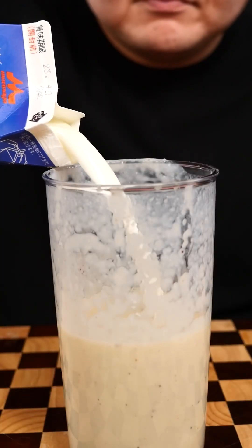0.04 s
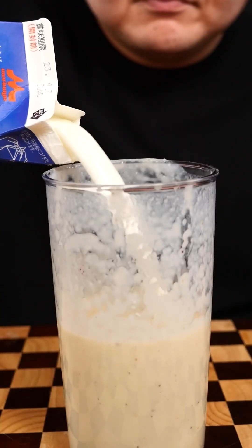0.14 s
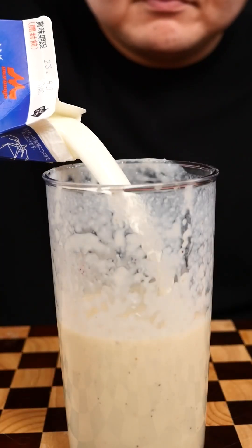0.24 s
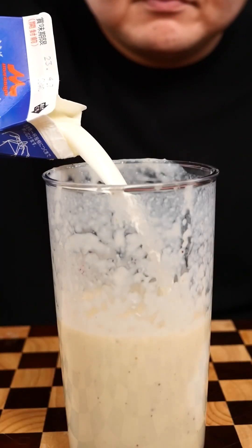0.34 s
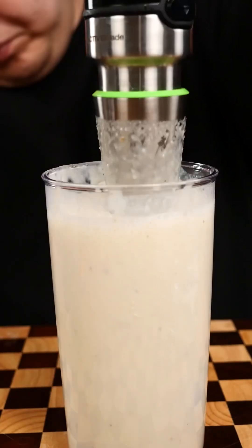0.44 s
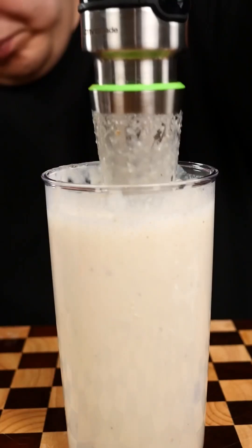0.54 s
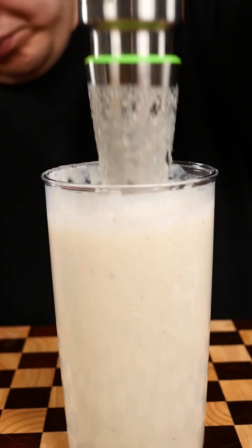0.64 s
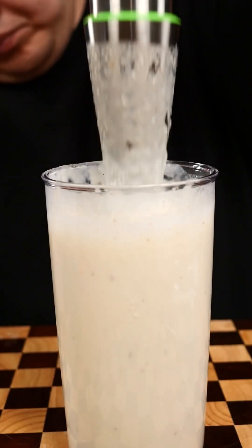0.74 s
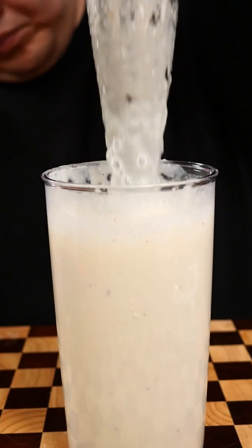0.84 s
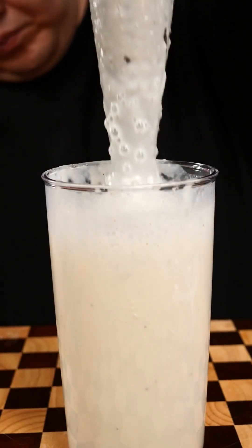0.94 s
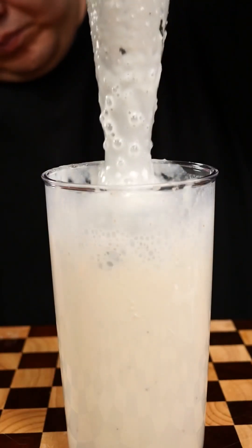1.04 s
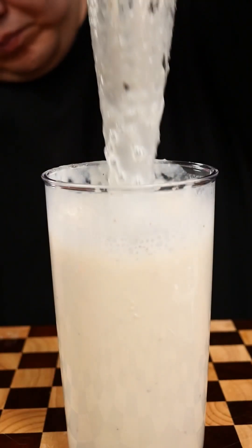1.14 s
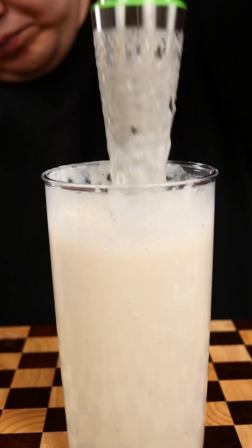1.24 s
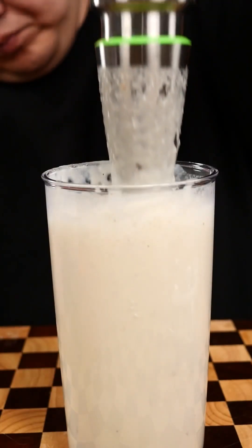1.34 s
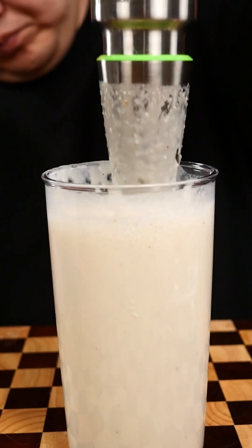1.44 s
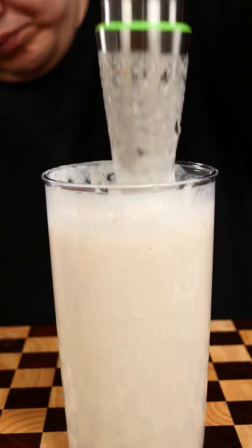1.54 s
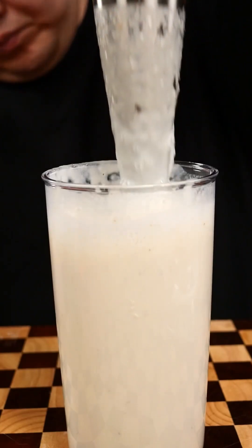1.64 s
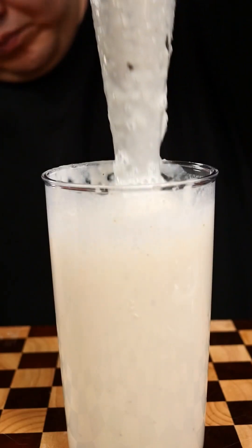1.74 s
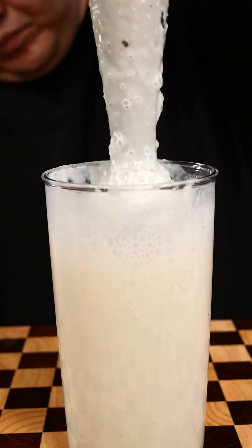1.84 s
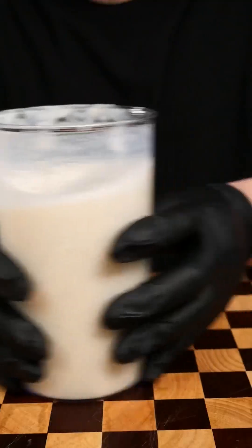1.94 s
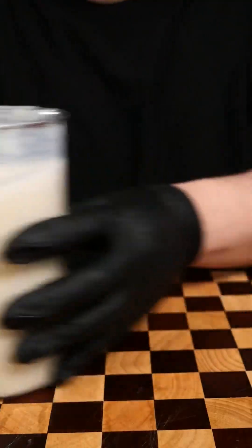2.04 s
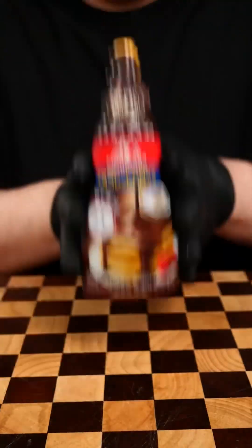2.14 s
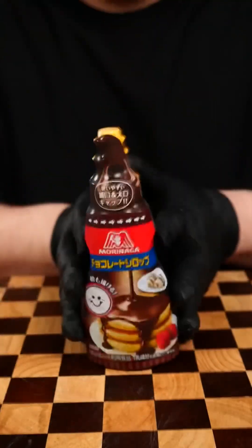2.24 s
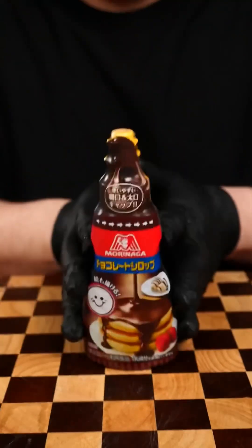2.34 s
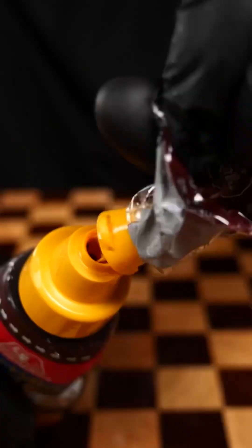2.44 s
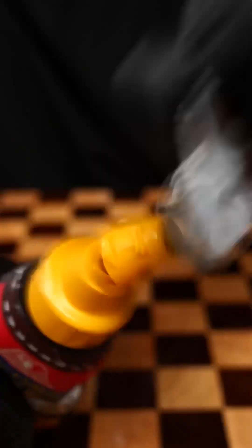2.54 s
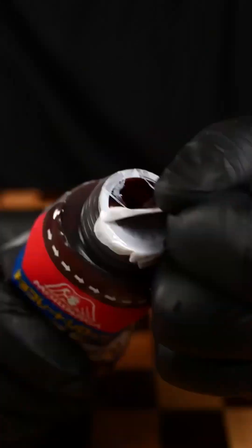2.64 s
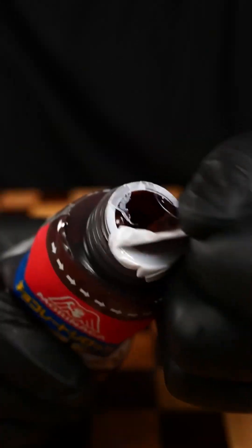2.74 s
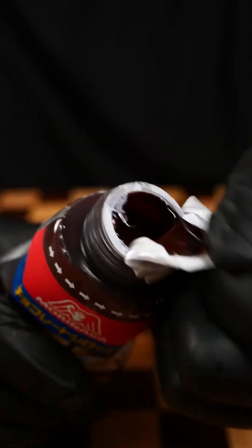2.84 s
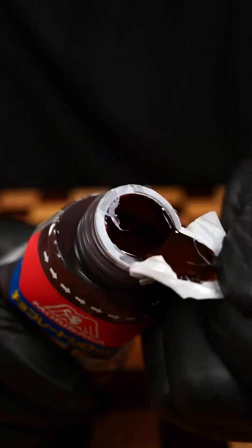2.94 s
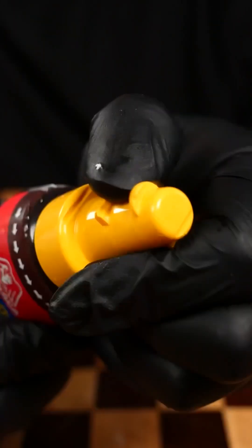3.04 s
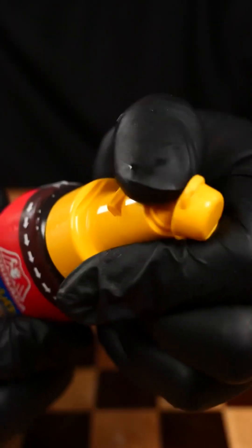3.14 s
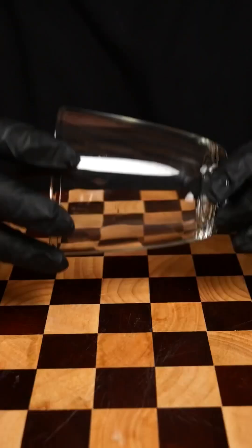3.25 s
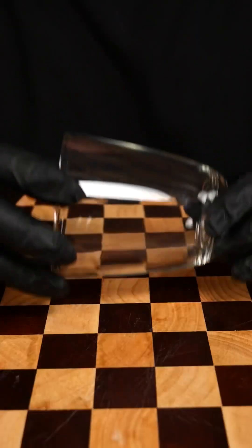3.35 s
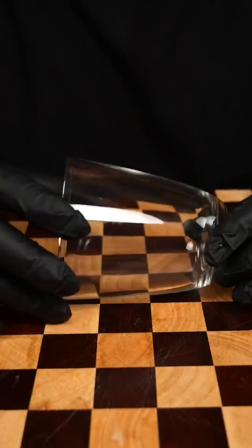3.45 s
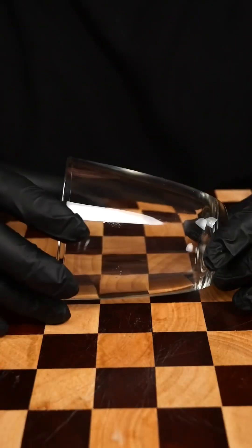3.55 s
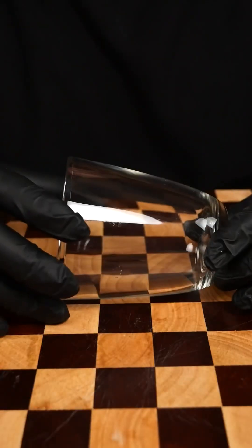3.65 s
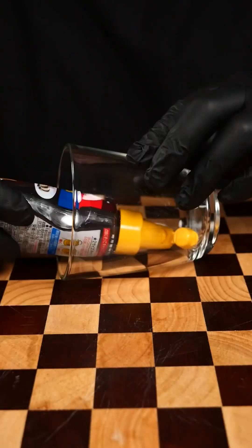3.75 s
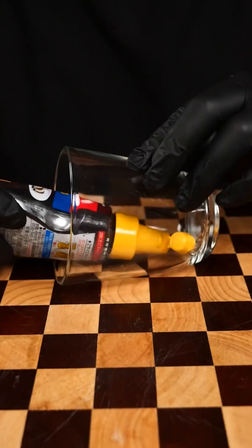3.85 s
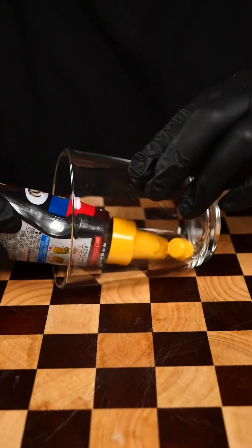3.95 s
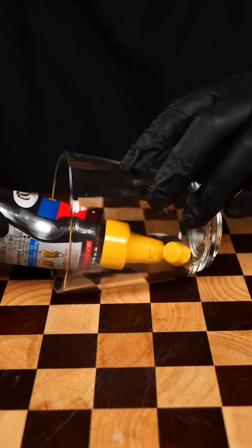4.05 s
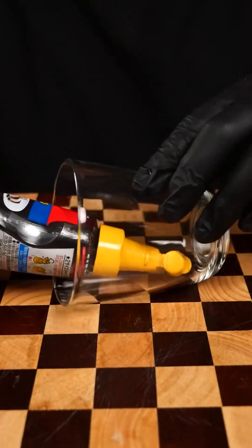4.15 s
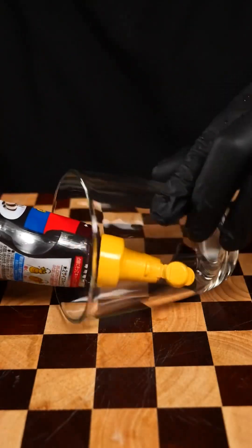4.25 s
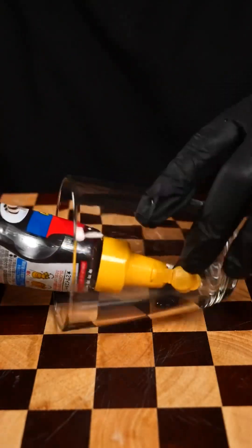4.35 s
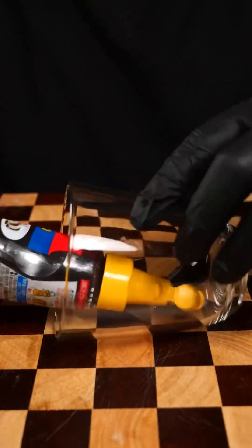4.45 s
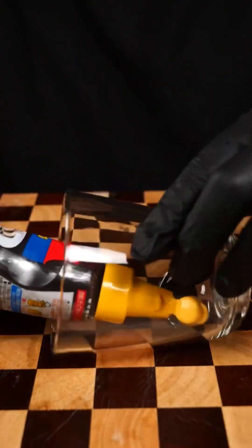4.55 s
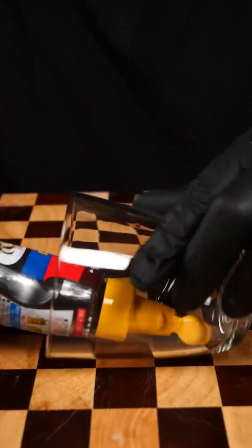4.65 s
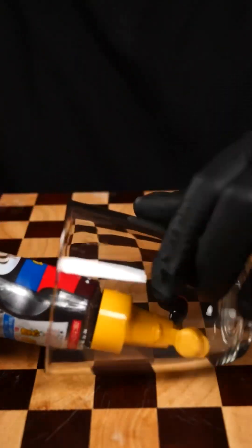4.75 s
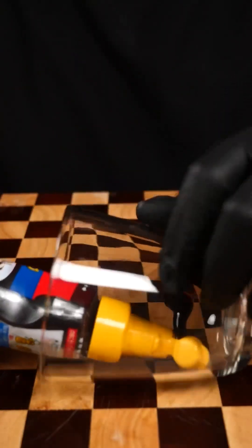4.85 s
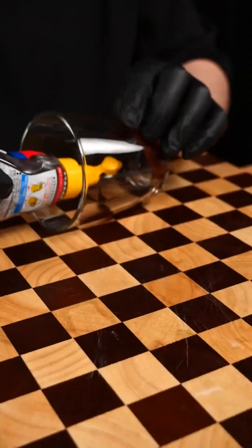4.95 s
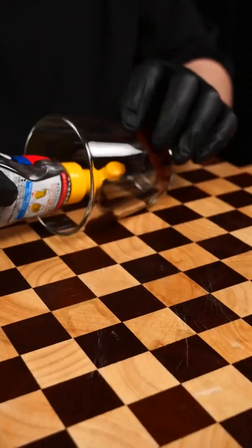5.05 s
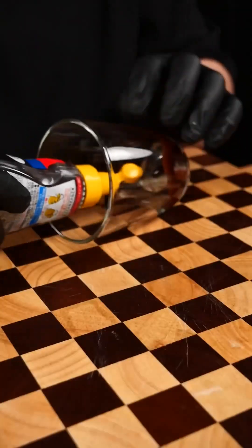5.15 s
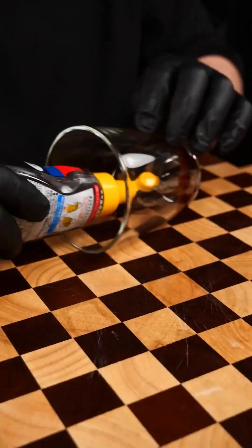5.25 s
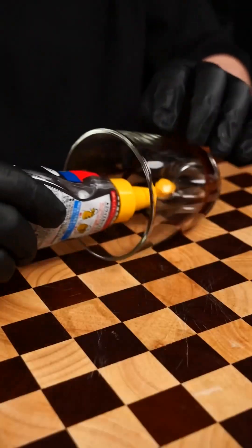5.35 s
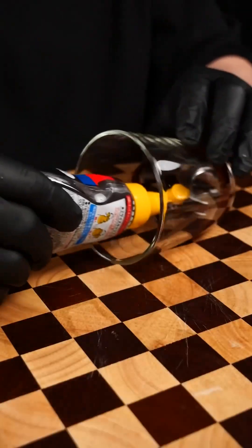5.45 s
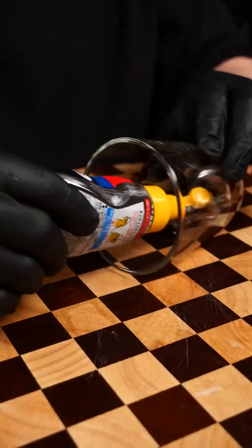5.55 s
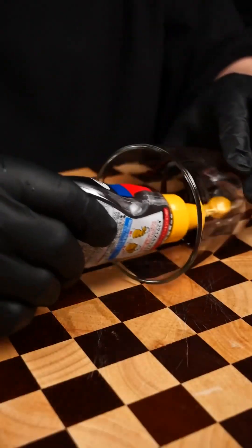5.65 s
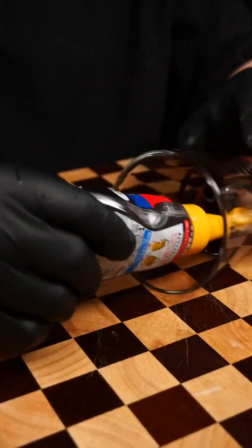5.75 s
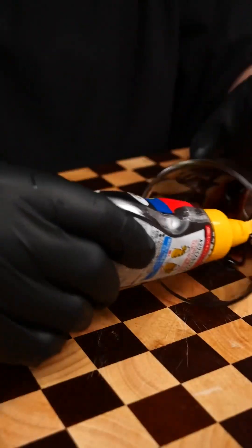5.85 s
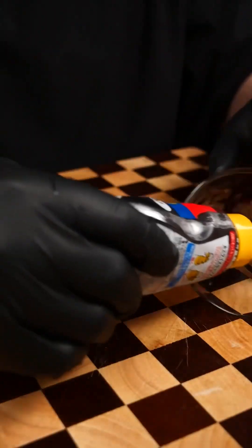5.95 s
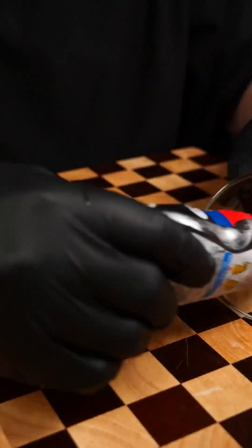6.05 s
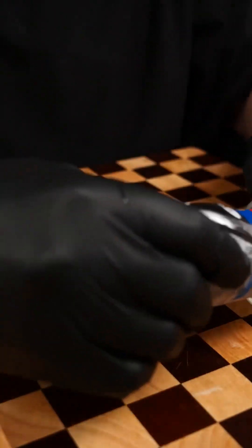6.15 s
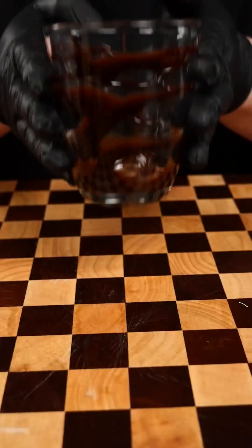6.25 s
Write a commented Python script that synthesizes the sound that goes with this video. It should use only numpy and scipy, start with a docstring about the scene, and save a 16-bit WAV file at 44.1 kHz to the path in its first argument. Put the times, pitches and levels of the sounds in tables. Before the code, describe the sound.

A hand blender briefly churns milk, then a plastic bottle thuds and snaps open, and a glass knocks and rolls quietly on wood.

```python
"""A hand blender churns milk in a jar, heard close on a kitchen counter: its gears whine while the blade
plunges, lifts and splashes through the surface. Milk drips first; afterwards the jar scrapes away. A
plastic bottle thuds down, its wrap snaps, its seal peels and its cap pops on, ringing the neck. A tumbler
is laid on a wooden board and rolled under rubber gloves while the nozzle chinks on it. Hard cuts join the
short shots, each with its own gain, so hiss and hum step; the loudest blows saturate."""
import sys
import numpy as np
from scipy import signal
from scipy.fft import rfft, irfft, next_fast_len
from scipy.io import wavfile
from scipy.ndimage import uniform_filter1d, map_coordinates

SR = 44100
rng = np.random.default_rng(int(sys.argv[2]) if len(sys.argv) > 2 else 0)


def wav_out(sig):
    """Save sig, one row per channel (or a flat mono array), as 16-bit PCM at SR to the path in sys.argv[1]."""
    wavfile.write(sys.argv[1], SR, np.round(np.clip(np.atleast_2d(sig).T, -1, 1) * 32767).astype(np.int16))


N = 277609
T = np.arange(N) / SR

# Background bed of each shot: start_s, hiss_db, hum_db, murmur_db
SHOTS = [(0, -61, -61.5, -58.5), (.483, -59, -62, -54.5), (2.127, -60, -61.5, -58),
         (2.234, -81, -57.5, -53), (2.443, -57.5, -60, -59), (2.557, -74, -52, -74),
         (2.64, -62.5, -59.5, -60.5), (2.96, -61.5, -59, -58.5), (3.46, -77, -74, -52.5),
         (3.708, -61.5, -81.5, -58.5), (4.93, -60, -73.5, -62.5), (6.179, -62, -62.5, -59.5)]
# Colours of preamp hiss, room hum and appliance murmur: freq_hz, density_db
HISS = [(300, -10.5), (2000, 12.5), (14500, 4), (15800, -3), (16150, -41.5)]
HUM = [(20, -33.5), (60, -18.5), (130, -1.5), (250, 3.5), (400, -4), (700, -31)]
MURMUR = [(250, -17), (550, 2.5), (1000, -1.5), (2000, -7.5), (3000, -17), (4500, -26.5)]
# Steady tones, one set per shot: appliance whines, and in the last set a ringing of the glass near 3.3 kHz:
# level_db, bands of (centre_hz, width_hz, gain_db)
STEADY_TONES = [(-61, [(983, 4.1, 4), (1186, 14, -12)]), (-61.5, [(759, 15, -7.5), (1790, 10.5, -13),
                (2896, 41, -15), (3440, 8.3, -11)]), (-61, [(366, 59, -9), (482, 4.4, 3),
                (2050, 19, -3), (3286, 50, -10)])]
# Where each set of tones is heard: shot_index
WHINE_SHOTS = [0, 9, 10]
# Milk drips, and slaps of milk thrown off the blade: start_s, level_db, pitch_hz
DRIPS = [(0.0199, -37.5, 2140), (0.0892, -35, 2240), (0.2264, -38.5, 2230), (0.2483, -37, 2200),
         (0.3815, -36, 3900), (0.391, -36, 2460), (0.4469, -40, 2300)]
SPLATS = [(.981, -12, 1490), (1.005, -8, 2480), (1.079, -8.5, 1510), (1.872, -10.5, 1280)]

# The switch and the blade's first jerks: start_s, level_db
START_JERKS = [(0.484, -30), (0.4923, -19), (0.4977, -12), (0.5075, -3.5)]
# Ring of the shaft and guard: pitch_hz, gain_db, t60_s
SHAFT_MODES = [(1700, 0.5, 0.016), (2300, 10, 0.0041), (3400, -9, 0.011), (5200, -12.5, 0.0094),
               (6400, -15.5, 0.0079)]
# The blade's path: time_s, height (0 deep in the jar, 1 at the surface, 2 clear of it)
BLADE_PATH = [(.5, 1.3), (.61, 0), (.82, 0.13), (.92, 0.37), (.965, 0.56), (1.045, 1.23), (1.075, 1.91),
              (1.125, 2), (1.24, 0.14), (1.35, 0.16), (1.6, 0.22), (1.75, 0.28), (1.81, 0.67), (1.92, 1.94)]
# Low shaft orders and one overtone, against the gear whine: pitch_ratio; gain_db
ORDER_RATIOS = [1 / 24, 2 / 24, 4 / 24, 5 / 24, 6 / 24, 2]
ORDER_DB = [-25, -17.5, -10, -9, -5, -21.5]
# Bearing rasp: centre_hz, width_hz, gain_db
BEARING_BANDS = [(4800, 140, 0), (4860, 180, 0)]
# Colours of churn, splash, spray and the surface breaking: freq_hz, density_db
CHURN = [(35, -47), (60, -35), (81, -38), (119, -26), (220, -16.5), (345, -3), (563, -4), (797, 3),
         (1070, -16.5), (1300, -58), (1690, -52), (2860, -120)]
SPLASH = [(530, -35), (900, -5), (945, 2), (1380, 5), (2140, 2), (3300, -17.5), (4290, -33), (7260, -120)]
SPRAY = [(1650, 0.5), (2800, 3), (4340, -2), (4430, -7), (4910, 1), (5480, -6), (8240, -12.5), (9820, -23),
         (12900, -38), (16000, -63)]
SURF = [(900, -59), (1400, -4.5), (2000, 2), (2600, 1), (3000, -12), (4200, -17), (7000, -28.5)]
# Fader curve of the sliding jar: time_s, level_db
SLIDE_LEVELS = [(1.893, -37.5), (1.958, -34), (1.962, -30.5), (2.02, -27), (2.06, -26), (2.08, -24),
                (2.11, -24), (2.125, -29.5)]
# Colour of its scrape: freq_hz, density_db
SCRAPE = [(60, -40.5), (130, -21), (222, -21.5), (301, -8.5), (427, -16), (682, 0.5), (1380, -14),
          (1620, -7), (2050, -13.5), (2580, -10), (3040, -24), (6740, -33.5), (16000, -61.5)]

# The bottle's edge touches first: start_s, level_db, pitch_hz
EDGE_TOUCH = [(2.2345, -13.5, 892)]
# The bottle lands: start_s, level_db
BOTTLE_THUD = [(2.239, 1.5)]
# Ring of the bottle's body, and of its neck and cap: pitch_hz, gain_db, t60_s
BOTTLE_MODES = [(531, -13, 0.017), (767, 10, 0.0078), (1108, -5.5, 0.01), (1640, -6.5, 0.014),
                (2050, -4.5, 0.012), (2490, -17.5, 0.032), (4240, -1.5, 0.0035)]
NECK_MODES = [(530, -13, 0.022), (1254, -19.5, 0.03), (1880, 8, 0.0059), (2220, -9.5, 0.012),
              (2750, -5, 0.011), (3650, -11.5, 0.0078)]
# The board's clearest modes: pitch_hz, gain_db
BOARD_TONES = [(675, -0.5), (735, -3), (780, -1), (1230, -6.5)]
# The board's crowded modes and the counter's boom below: centre_hz, width_hz, gain_db
BOARD_BANDS = [(391, 45, -10), (740, 78, 5)]
COUNTER_BANDS = [(130, 16, 0.5), (179, 39, -10.5)]
# Snaps of wrap, seal and cap: start_s, level_db, treble_hz, neck_ring_db
SNAPS = [(2.474, -47, 5120, 1), (2.4867, -18.5, 5420, -23), (2.5573, 6.5, 4670, -10),
         (2.5588, 4.5, 5060, -5.5), (2.5616, 1.5, 6720, -18.5), (2.611, -37, 5000, 0),
         (2.6698, -22.5, 6200, -25.5), (2.6968, -12, 10750, -33), (2.7143, -16.5, 6300, -9),
         (2.7731, -20.5, 10300, -28), (2.7946, -24.5, 5900, -4.5), (2.804, -6.5, 6360, -20),
         (2.8512, -13.5, 5570, -14), (2.863, -30.5, 5200, -25), (2.8784, -29.5, 6740, -13),
         (2.92, -30, 3640, -5.5), (3.0345, -52, 3000, 17), (3.0818, -5, 5340, 5), (3.0892, -16, 5440, 2),
         (3.126, -29.5, 5460, -13), (3.2492, -47, 4040, 18)]
# Colours of the torn wrap and the crackling seal: freq_hz, density_db
WRAP = [(1000, -13), (2200, -2.5), (7500, -1.5), (12000, -21)]
CRACKLE = [(1760, -18), (3000, -28), (4200, -4), (6130, 3), (11800, -10.5), (16000, -23.5)]
# Pulls at the seal: peak_s, neck_rasp_db, crackle_db
TUGS = [(2.719, -39, -49), (2.77, -35.5, -56), (2.809, -45, -46.5), (2.865, -31, -30.5)]
# Air in the sealed neck, the open neck and the seated cap: centre_hz, width_hz, gain_db
NECK_SHUT, NECK_OPEN = [(2080, 110, 0)], [(2380, 160, 0), (900, 500, -14)]
CAP_HOLLOW = [(2050, 360, 0)]
# Air pushed out as the cap seats: start_s, level_db, pitch_hz
CAP_POP = [(3.0814, -16.5, 470)]

# The tumbler lands and bounces: start_s, level_db
TUMBLER_HITS = [(3.4628, -6.5), (3.4765, -18.5), (3.486, -24.5)]
# Its ring on landing, then under the nozzle before and after the regrip: pitch_hz, gain_db, t60_s
TUMBLER_MODES = [(405, -7.5, 0.014), (729, 0, 0.021), (967, -4.5, 0.024), (1568, -17, 0.087),
                 (2097, -17.5, 0.08), (2374, 11, 0.0074), (2466, -16, .06), (2935, -8, 0.019),
                 (3774, -28, 0.17), (4840, -11.5, 0.0081), (6560, -31, 0.049)]
GLASS_MODES = [(4735, 0, 0.24), (4950, 1, 0.03), (11300, -13, 0.12)]
RIM_MODES = [(885, 6.5, 0.022), (1445, 11.5, 0.0093), (3204, -2, 0.086), (7500, -15, 0.11)]
# The gloves shift: peak_s, level_db
RUSTLES = [(4.0, -64), (4.33, -58), (4.58, -50.5), (4.85, -60.5), (4.95, -75), (5.05, -58.5), (5.27, -59),
           (5.57, -61), (6.05, -78)]
# Colour of the rubber: freq_hz, density_db
GLOVE = [(3000, -3), (6000, 5.5), (9000, -4.5), (12000, 0), (15600, -2.5), (16100, -33.5)]
# Fader curve of the rim rubbing on the board: time_s, level_db
ROLL_LEVELS = [(3.72, -69), (4.27, -63.5), (4.32, -50.5), (4.36, -70), (4.41, -48.5), (4.45, -63),
               (4.92, -65), (5.1, -57), (5.2, -58), (5.3, -53), (5.42, -58.5), (5.68, -58), (5.73, -49),
               (5.78, -64), (5.83, -49.5), (5.87, -55.5), (5.93, -48.5), (6.03, -61), (6.13, -58),
               (6.181, -46)]
# The rub before and after the regrip: centre_hz, width_hz, gain_db
RUB_HIGH, RUB_LOW = [(2170, 370, 0)], [(1360, 240, 15), (840, 210, 7.5), (1740, 71, -11)]
# Contacts that stand out of the roll, and sharp crackles of the gloves near 14 kHz: start_s, level_db, pitch_hz
ROLL_TICKS = [(3.9847, -35, 7000), (4.367, -35, 2050), (4.4975, -30, 2050), (4.538, -37.5, 1960),
              (4.553, -38, 14500), (4.678, -40, 14900), (4.755, -40, 14300), (4.7686, -39, 5000),
              (4.898, -40, 13500), (4.8026, -30.5, 2170), (4.9521, -31.5, 10640), (4.9901, -22, 10320),
              (5.204, -33, 9900), (5.466, -32, 1400), (5.7987, -35, 1360), (5.8985, -35, 1420),
              (5.9385, -34, 1110)]
# The nozzle touches the glass: start_s, level_db
CHINKS = [(3.7444, -46), (4.279, -45.5), (4.405, -51), (4.498, -46), (4.5924, -39), (4.629, -59),
          (4.7125, -43), (4.805, -57), (4.862, -58), (5.983, -39.5), (6.0876, -40), (6.0967, -37.5)]

# Colour of the kitchen's reverb: freq_hz, gain_db
REVERB_COLOUR = [(60, -12), (150, -4.5), (450, 1.5), (780, 6.5), (1200, 2.5), (2200, 2.5), (4000, 2),
                 (12000, -7)]
# Its decay: freq_hz, t60_s
REVERB_DECAY = [(150, 0.78), (800, 0.46), (2500, 0.31), (6000, 0.094), (12000, .12)]
# Level of the side signal against the mid: freq_hz, side_db
WIDTH = [(60, -21), (240, -30.5), (950, -80), (3770, -41), (15000, -27.5)]

MOTOR_ON_S, MOTOR_CUT_S = .498, 1.892
PEEL_S, PEEL_OPEN_S, PEEL_END_S = 2.7, 2.93, 2.965


def amp(db):
    return 10 ** (np.asarray(db) / 20)


def unit(x):
    return x / np.sqrt(np.mean(x ** 2) + 1e-20)


def along(points, hz):
    """Read a curve of (freq_hz, value) points on a log frequency axis."""
    freqs, values = np.transpose(points)
    return np.interp(np.log(hz + 1), np.log(freqs + 1), values)


def fader(points):
    """Gain through (time_s, level_db) points, silent outside them."""
    return amp(np.interp(T, *np.transpose(points), -150, -150))


def swells(times, dbs, rise_s, fall_s):
    """Summed gain of swells that grow to their peak and die away."""
    dt = T - np.asarray(times)[:, None]
    return amp(dbs) @ np.exp(np.where(dt < 0, dt / rise_s, -dt / fall_s))


def dying(s, db, t60):
    """Gain that opens at s and falls 60 dB in t60."""
    return amp(db - 60 * np.maximum(T - s, 0) / t60) * (T >= s)


def wobble(rate):
    """A smooth random curve, rate knots a second."""
    return map_coordinates(rng.standard_normal(int(N * rate / SR) + 4), [T * rate])


def filtered(x, response):
    """EQ x with a response given as a function of frequency."""
    size = next_fast_len(N + 8192)
    return irfft(rfft(x, size) * response(np.fft.rfftfreq(size, 1 / SR)), size)[..., :N]


def noise(spectrum, grain_db=0., rate=300.):
    """Coloured noise of rms 1, made grainy by fast random gain."""
    grains = rng.standard_normal(N) * amp(grain_db * wobble(rate))
    curve = [(0.93, -120), *spectrum, (22000, -120)]
    return unit(filtered(grains, lambda hz: amp(along(curve, hz))))


def resonant(bands):
    """Noise of rms 1 through (centre_hz, width_hz, gain_db) resonances."""
    def response(hz):
        return sum(amp(db) * 1j * hz * width / (centre ** 2 - hz ** 2 + 1j * hz * width)
                   for centre, width, db in bands)
    return unit(filtered(rng.standard_normal(N), response))


def mottle(x, depth_db, bins=3):
    """Make the spectrum flicker in random patches some 40 ms long."""
    spectrum = signal.stft(x, nperseg=512)[2]
    patches = uniform_filter1d(rng.standard_normal(spectrum.shape), size=bins, axis=0)
    patches = uniform_filter1d(patches, size=6, axis=1)
    return unit(signal.istft(spectrum * amp(depth_db * unit(patches)), nperseg=512)[1][:N])


def strike(out, s, db, modes, crack_db, crack_t60):
    """Add one blow: a sharp push and a brief rough contact ring the modes; the contact itself cracks."""
    burst = 1200  # samples
    ring_s = min(.25, max(t60 for _, _, t60 in modes))
    t = np.arange(max(burst, int(ring_s * SR))) / SR
    ring = sum(amp(gain + rng.normal(0, 1) - 60 * t / t60) * np.sin(2 * np.pi * hz * t)
               * (1 - np.exp(-hz * t)) for hz, gain, t60 in modes)
    rough = amp(-60 * t[:burst] / crack_t60) * rng.standard_normal(burst)
    sound = ring + .45 * signal.fftconvolve(ring, rough / np.linalg.norm(rough))[:len(t)]
    sound[:burst] += amp(crack_db) * np.convolve(rough, [.5, 1, .5, -.5, -1, -.5])[:burst]
    part = out[round(s * SR):][:len(t)]
    part += (amp(db) * sound)[:len(part)]


def blows(events, modes, trim_db, crack_db, crack_t60):
    """A run of blows on one object."""
    out = np.zeros(N)
    for s, db in events:
        strike(out, s, db + trim_db, modes, crack_db, crack_t60)
    return out


def taps(events, cycles, crack_db):
    """Small contacts, each at its own pitch, falling 60 dB in so many cycles."""
    out = np.zeros(N)
    for s, db, hz in events:
        strike(out, s, db, [(hz, -2, cycles / hz)], crack_db, crack_t60=.004)
    return out


def shot(x, start_s, end_s, reverb_db, dull_hz):
    """x with the kitchen's reverb, darker above dull_hz, gated between two cuts."""
    hz, t, spectrum = signal.stft(rng.standard_normal(SR // 2), SR, nperseg=256)
    fade_db = along(REVERB_COLOUR, hz)[:, None] - 60 * t / along(REVERB_DECAY, hz)[:, None]
    tail = signal.istft(spectrum * amp(fade_db) / (1 + (hz[:, None] / dull_hz) ** 2), SR, nperseg=256)[1]
    predelayed = np.pad(x, (300, 0))
    wet = signal.fftconvolve(predelayed, tail / np.linalg.norm(tail))[:N]
    return (x + amp(reverb_db) * wet) * (T >= start_s) * (T < end_s)


def background():
    """Preamp hiss, room hum and appliances step in level at every cut."""
    starts, *level_columns = np.transpose(SHOTS)
    shot_index = np.searchsorted(starts, T, "right") - 1
    hiss, hum, murmur = [amp(db)[shot_index] for db in level_columns]
    whines = sum(amp(db) * (shot_index == k) * resonant(bands)
                 for k, (db, bands) in zip(WHINE_SHOTS, STEADY_TONES))
    return hiss * noise(HISS) + hum * noise(HUM) + murmur * noise(MURMUR) + whines


def milk_drips():
    """Milk trickles in as tiny pitched plinks."""
    return taps(DRIPS, cycles=32, crack_db=-19)


def motor(run_s, height, surface):
    """Gears spin up and whine over shaft orders and bearing rasp; the pitch rises as the blade lifts."""
    gear_hz, start_hz, spin_up_s, gear_db = 2110, 1400, .022, -29.5
    unload_hz, sag_hz_per_s = 9.2, 7.9
    hz = gear_hz - (gear_hz - start_hz) * np.exp(-run_s / spin_up_s)
    hz += unload_hz * height - sag_hz_per_s * run_s
    phase = 2 * np.pi * np.cumsum(hz + 4.9 * wobble(11) + 14.06 * wobble(120)) / SR
    # The low orders flutter, and fade as the blade lifts.
    orders = sum(amp(db + (4.8 * wobble(24.87) - 5.5 * height) * (ratio < 1)) * np.sin(ratio * phase)
                 for ratio, db in zip(ORDER_RATIOS, ORDER_DB))
    whine = amp(2.34 * wobble(59.9)) * np.sin(phase)
    gain = np.sqrt(2) * amp(gear_db - 5.5 * surface)  # ducks as the blade breaks the surface
    fuzz = amp(gear_db - 8.5) * resonant([(gear_hz, 130, 0)])  # rough teeth blur the whine
    rasp = sum(amp(-57.5 + 1.4 * wobble(6)) * resonant([band]) for band in BEARING_BANDS)
    return gain * (whine + orders) + fuzz + rasp


def churning_milk(height, surface):
    """A deep blade gives a full gurgle; at the surface it thins and splash and spray take over."""
    churn = amp(-20 - 6 * np.abs(height) ** 0.8) * mottle(noise(CHURN), depth_db=3)
    splash = amp(-28 + 7 * surface + 0.6 * height) * noise(SPLASH, grain_db=1.5, rate=60)
    spray = amp(-37 + 3.5 * surface) * noise(SPRAY, grain_db=1.5, rate=280)
    surf = amp(-23) * surface * mottle(noise(SURF, grain_db=2, rate=150), depth_db=-3)
    return churn + splash + spray + surf


def blender():
    """The shaft jerks into motion, then the blade's height steers both motor and milk."""
    turning_s, surge_s, bite_s = 0.023, 0.13, 0.0081  # hand reverses; first splash fades; milk gets moving
    height = np.interp(T, *np.transpose(BLADE_PATH))
    run_s = np.maximum(T - MOTOR_ON_S, 0)
    rising = uniform_filter1d((np.gradient(height) > 0) * 1., size=round(turning_s * SR))
    # The surface breaks when the blade rises through it, and once at the start.
    surface = rising * np.exp(-((height - 1) / 0.54) ** 2) + 0.68 * np.exp(-(run_s / surge_s) ** 2)
    fade_in = np.minimum(run_s / bite_s, 1) ** 2
    running = motor(run_s, height, surface) + churning_milk(height, surface)
    jerks = blows(START_JERKS, SHAFT_MODES, trim_db=-4.5, crack_db=-31, crack_t60=0.003)
    splats = taps(SPLATS, cycles=26, crack_db=-33.5)
    return (fade_in * running + jerks + splats) * (T < MOTOR_CUT_S)


def jar_slide():
    """The jar drags over the board in a swelling, grainy scrape."""
    return fader(SLIDE_LEVELS) * mottle(noise(SCRAPE, grain_db=1.5, rate=70), depth_db=0.5)


def bottle_landing():
    """The plastic bottle touches edge first, then thuds down and wakes the board."""
    edge = taps(EDGE_TOUCH, cycles=9, crack_db=-34.5)
    thud = blows(BOTTLE_THUD, BOTTLE_MODES, trim_db=3.3, crack_db=-6, crack_t60=0.0016)
    return edge + thud + board(BOTTLE_THUD[-1][0], db=-35, t60=0.28, boom_db=-39)


def board(s, db, t60, boom_db, boom_t60=1):
    """The board blooms a few ms after a landing and hums out over the counter's boom."""
    t = np.maximum(T - s, 0)
    tones = sum(amp(gain + 5.5 + 2.8 * wobble(30)) * np.sin(2 * np.pi * hz * t) for hz, gain in BOARD_TONES)
    hum = dying(s, db, t60) * (resonant(BOARD_BANDS) + tones)
    boom = dying(s, boom_db, boom_t60) * resonant(COUNTER_BANDS)
    return (hum + boom) * (1 - np.exp(-(t / 0.0031) ** 2))


def plastic_snaps():
    """Bright snaps ring the neck; those of the seal also sound its air, a note that rises as it opens."""
    out = np.zeros(N)
    for s, db, hz, neck_db in SNAPS:
        modes = [(hz, -2, .0045), (1.3 * hz, -6, .0035), (0.68 * hz, -9, .004)]
        if PEEL_S - .05 < s < PEEL_END_S:
            air_hz = np.interp(s, [PEEL_S, PEEL_OPEN_S], [NECK_SHUT[0][0], NECK_OPEN[0][0]])
            modes.append((air_hz, neck_db + 8, 0.015))
        modes += [(pitch, gain + neck_db - 7, t60) for pitch, gain, t60 in NECK_MODES]
        strike(out, s, db, modes, crack_db=-12, crack_t60=.006)
    return out


def wrap_rustle():
    """The torn wrap settles after the loudest snap."""
    return dying(SNAPS[2][0], db=-36, t60=.22) * noise(WRAP)


def seal_peel():
    """The seal crackles at each tug and creeps in between; its rasp brightens as the neck opens."""
    times, neck_db, crackle_db = np.transpose(TUGS)
    rise_s, fall_s, fade_s = 0.00577, 0.0081, 0.043
    creep = (T > PEEL_S) * np.clip((PEEL_END_S - T) / fade_s, 0, 1)
    rasp_gain = swells(times, neck_db, rise_s, fall_s) + amp(-48.5) * creep
    crackle_gain = swells(times, crackle_db, rise_s, fall_s) + amp(-50.5) * creep
    opened = np.clip((T - PEEL_S) / (PEEL_OPEN_S - PEEL_S), 0, 1)
    rasp = np.sqrt(1 - opened) * resonant(NECK_SHUT) + np.sqrt(opened) * resonant(NECK_OPEN)
    return rasp_gain * rasp + crackle_gain * noise(CRACKLE, grain_db=4, rate=450)


def cap_pop():
    """The cap pushes air out of the neck as it seats, and its hollow rings on."""
    hollow = dying(CAP_POP[0][0], db=-31.5, t60=0.23) * resonant(CAP_HOLLOW)
    return taps(CAP_POP, cycles=14, crack_db=-22.5) + hollow


def tumbler_landing():
    """The tumbler knocks on the board, bounces twice and leaves the wood humming."""
    knock = blows(TUMBLER_HITS[:1], TUMBLER_MODES, trim_db=6.5, crack_db=-5, crack_t60=0.0042)
    bounces = blows(TUMBLER_HITS[1:], TUMBLER_MODES, trim_db=6, crack_db=-31.5, crack_t60=0.0067)
    return knock + bounces + board(TUMBLER_HITS[0][0], db=-37, t60=0.3, boom_db=-55)


def gloves():
    """Rubber gloves rustle faintly, swelling whenever they shift."""
    gain = amp(-66) + swells(*np.transpose(RUSTLES), rise_s=0.044, fall_s=0.061)
    return gain * mottle(noise(GLOVE, grain_db=4.5, rate=99), depth_db=3, bins=30)


def tumbler_roll(regrip_s):
    """The uneven rim rubs and ticks over the board, and the gloves crackle sharply; the rub sits lower after
    the regrip."""
    bumps = amp(3.1 * np.tanh(wobble(35)))
    rub = np.where(T < regrip_s, resonant(RUB_HIGH), resonant(RUB_LOW))
    return fader(ROLL_LEVELS) * bumps * rub + taps(ROLL_TICKS, cycles=32, crack_db=-23.5)


def nozzle_chinks(regrip_s):
    """The nozzle taps the glass: bright at first, lower once the grip has moved."""
    early = [(s, db) for s, db in CHINKS if s < regrip_s]
    late = [(s, db) for s, db in CHINKS if s >= regrip_s]
    bright = blows(early, GLASS_MODES, trim_db=-5, crack_db=4, crack_t60=0.0021)
    return bright + blows(late, RIM_MODES, trim_db=-1.6, crack_db=-0.99, crack_t60=0.0018)


def scene():
    """A centred mix; from the bottle on, each action has its own reverb and is cut off hard."""
    cuts = [row[0] for row in SHOTS]
    mix = background() + milk_drips() + blender() + jar_slide()
    mix += shot(bottle_landing(), cuts[3], cuts[4], reverb_db=-24.5, dull_hz=6300)
    opening = plastic_snaps() + wrap_rustle() + seal_peel() + cap_pop()
    mix += shot(opening, cuts[4], cuts[8], reverb_db=-31.5, dull_hz=9000)
    mix += shot(tumbler_landing(), cuts[8], cuts[9], reverb_db=-24.5, dull_hz=3700)
    rolling = gloves() + tumbler_roll(regrip_s=cuts[10]) + nozzle_chinks(regrip_s=cuts[10])
    mix += shot(rolling, cuts[9], cuts[11], reverb_db=-18, dull_hz=5000)
    return np.array([mix, mix])


def record(dry):
    """Loud blows saturate, a faint side signal a quarter-cycle off the mid is added, and deep bass and extreme
    top are cut."""
    ceiling, low_cut_hz, top_hz = .7, 30, 16700
    mid = dry[0] / (1 + np.abs(dry[0] / ceiling) ** 8) ** (1 / 8)
    side = filtered(mid, lambda hz: 1j * amp(along(WIDTH, hz)))
    stereo = np.array([mid + side, mid - side])
    return filtered(stereo, lambda hz: (hz < top_hz) * hz ** 2 / (hz ** 2 + low_cut_hz ** 2))


dry = scene()
out = record(dry)
wav_out(out)
```